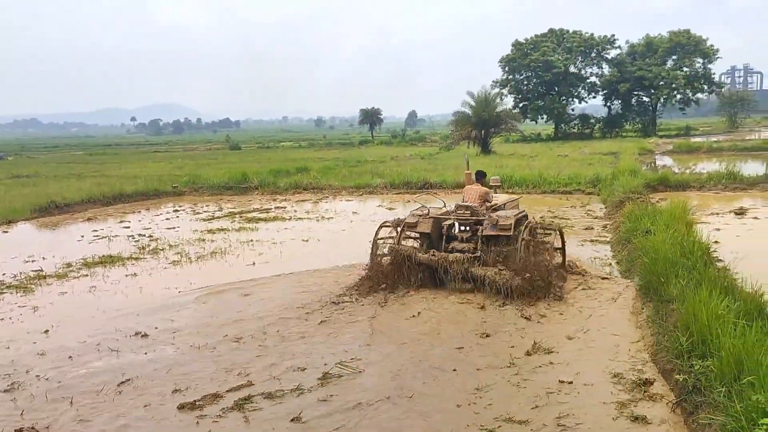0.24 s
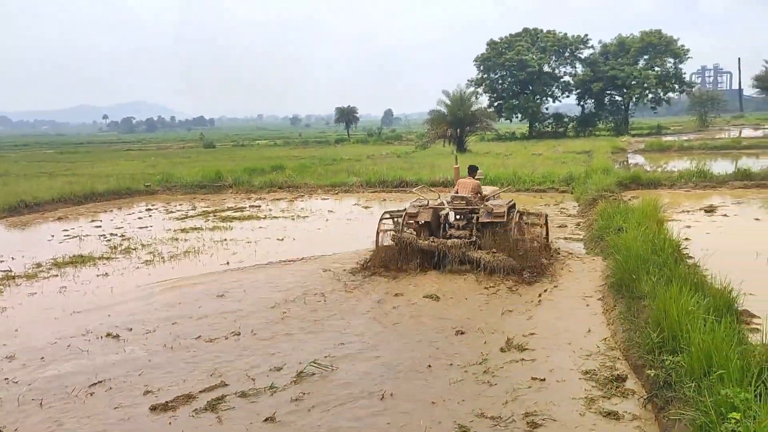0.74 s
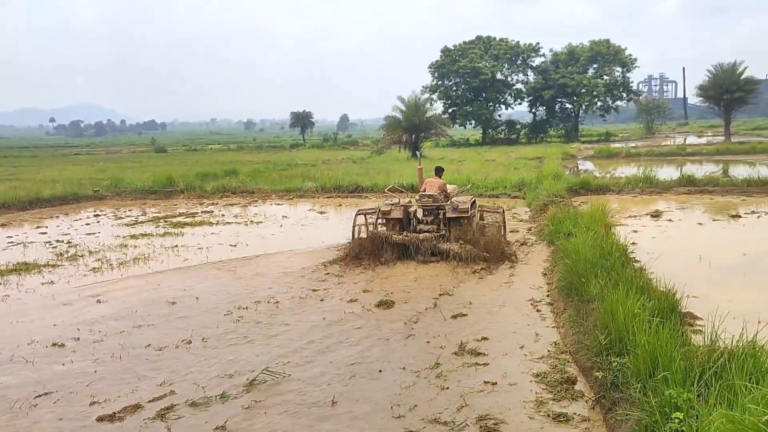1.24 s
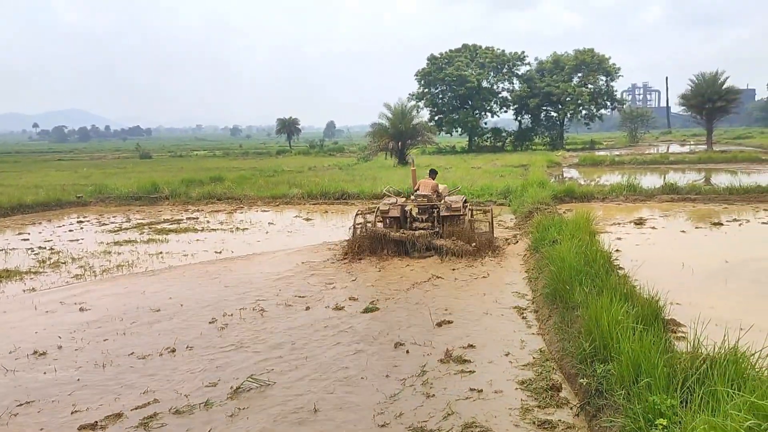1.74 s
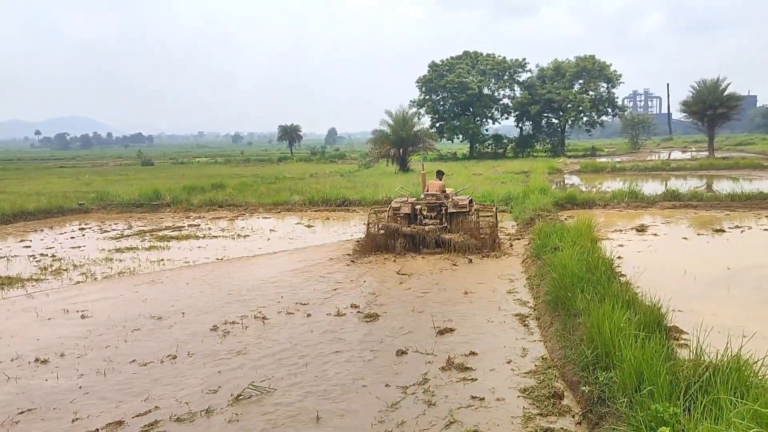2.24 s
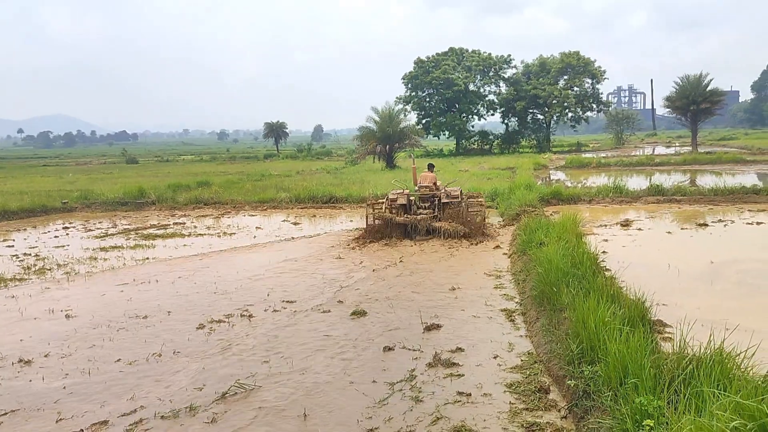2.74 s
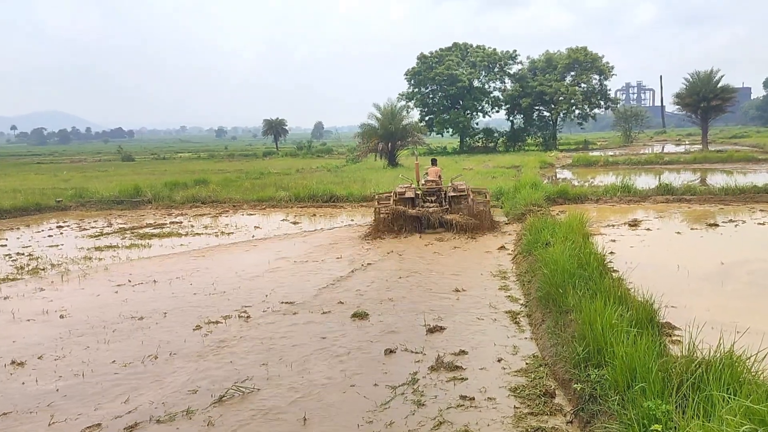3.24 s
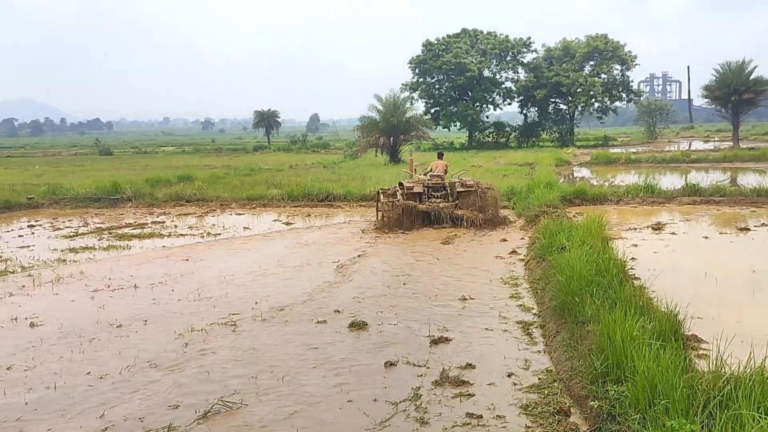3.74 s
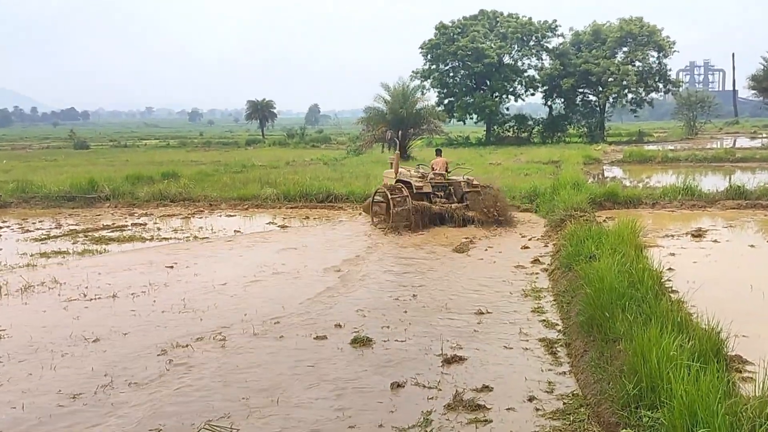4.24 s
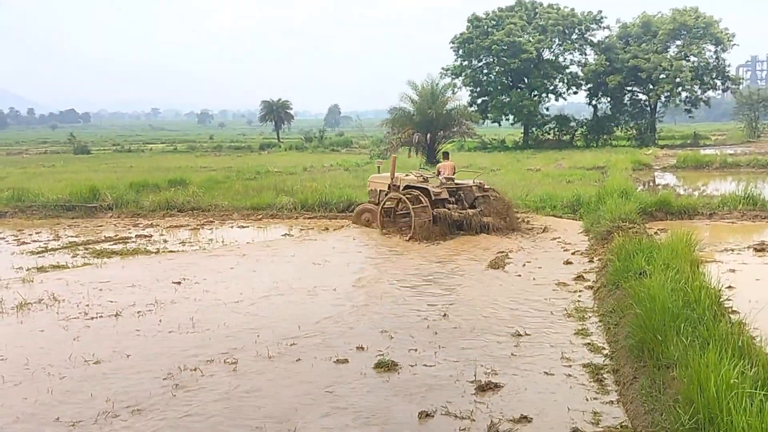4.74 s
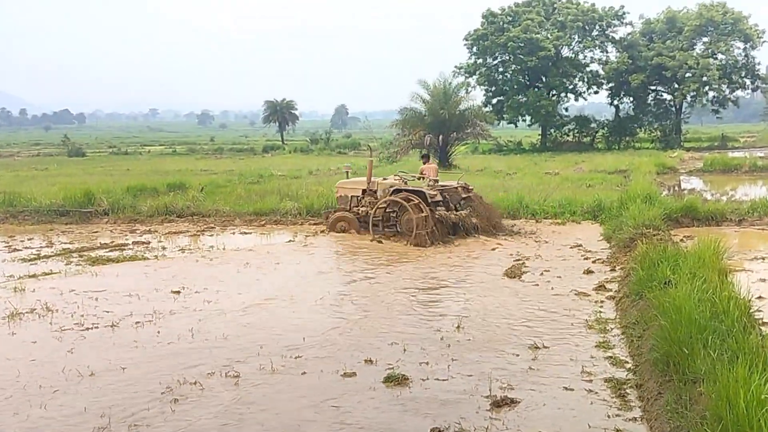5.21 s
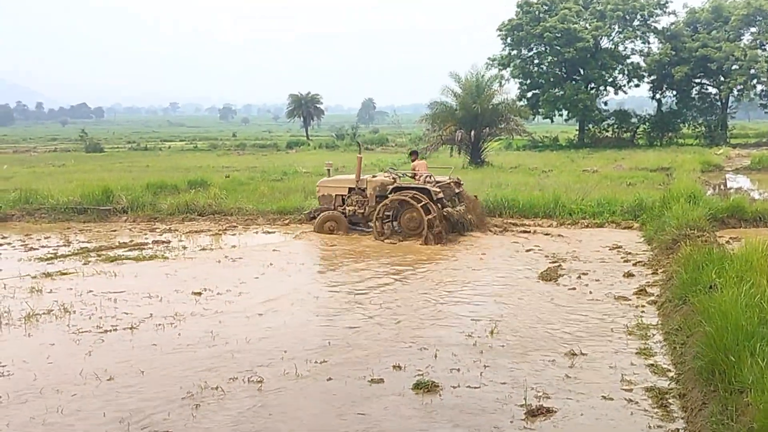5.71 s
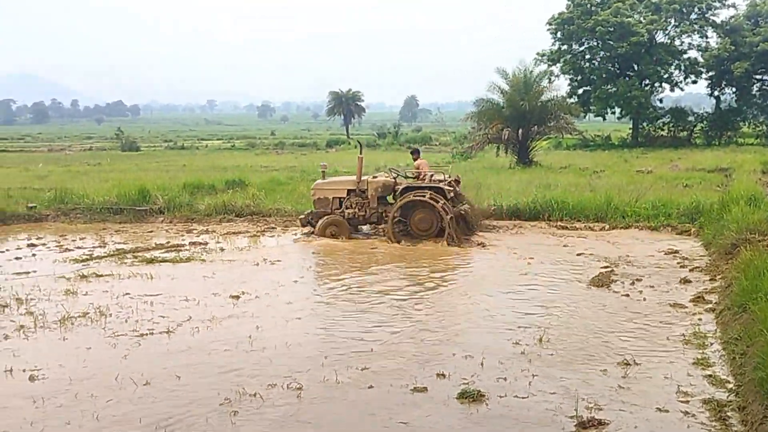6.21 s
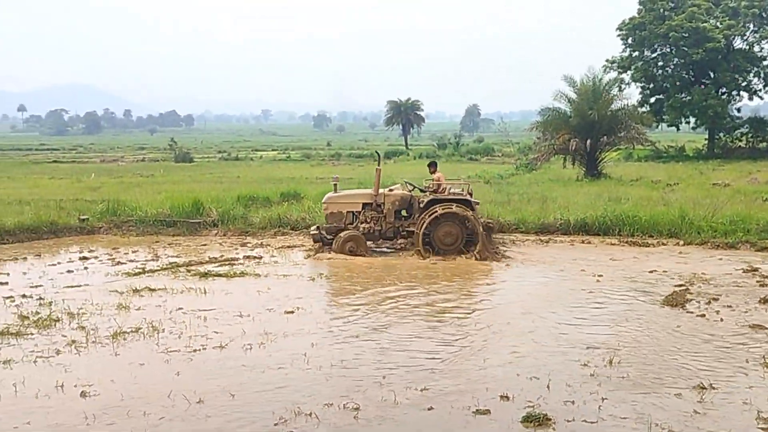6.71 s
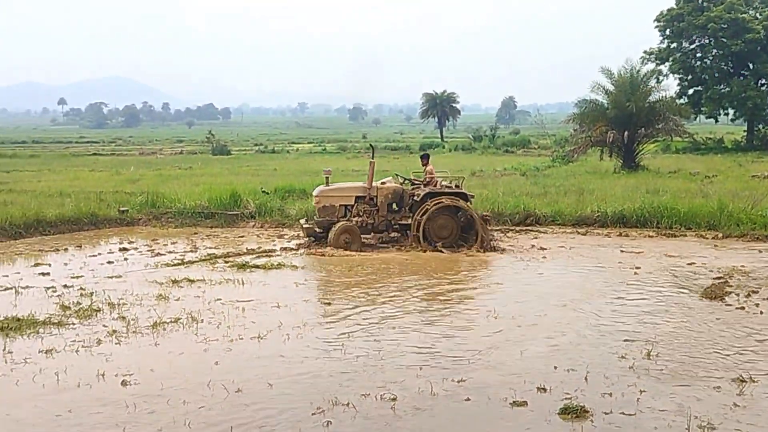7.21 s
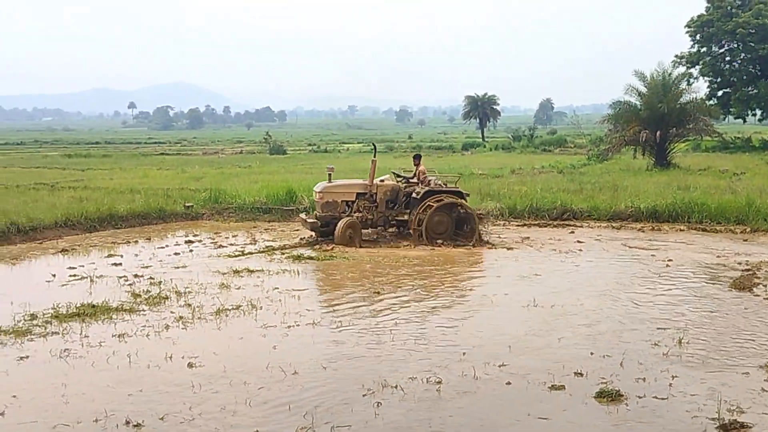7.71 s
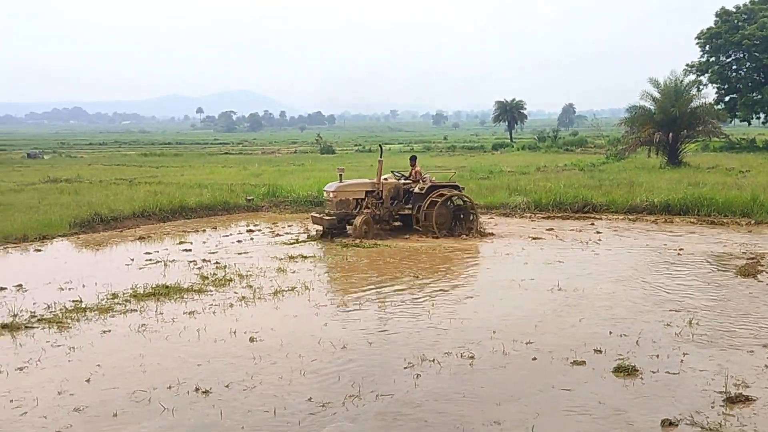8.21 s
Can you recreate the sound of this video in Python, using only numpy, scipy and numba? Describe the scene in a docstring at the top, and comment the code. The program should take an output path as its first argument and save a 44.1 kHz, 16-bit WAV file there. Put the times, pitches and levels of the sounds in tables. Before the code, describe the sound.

Steady low diesel throb and wet wheel churn outdoors; the engine briefly sags, then digs in slower and rougher, its bright, raspy exhaust slowly climbing.

```python
"""Tractor in a flooded field

A three-cylinder diesel tractor pulls tail-on, eases off while turning side-on, and pulls again.
Each firing gives a low thump and a burst of rough gas that rings the exhaust pipe at its first modes.
Filtered noise makes the wheels' churn and spray, the higher pipe modes and the exhaust hiss.
A gear sings faintly as narrow noise, and a few ripples plop at the near bank as short, rising tones."""
import sys
import numpy as np
from scipy import signal
from scipy.fft import rfft, irfft, next_fast_len
from scipy.io import wavfile
from scipy.ndimage import uniform_filter1d
from numba import njit

SR = 44100
rng = np.random.default_rng(int(sys.argv[2]) if len(sys.argv) > 2 else 0)


def output_pcm(signal):
    """Save a mono or channel-first signal as 16-bit PCM at the path in sys.argv[1].

    Samples are clipped to [-1, 1] before scaling.
    """
    pcm = np.clip(np.atleast_2d(signal).T, -1, 1) * 32767
    wavfile.write(sys.argv[1], SR, np.round(pcm).astype(np.int16))


N = 373086

# ripples at the bank: t/s (start is 12 ms earlier), starting f/Hz, level/dB before a 13 dB lift and
# the soft start, fall by 60 dB/s before 0.053 s is added, left over right/dB
PLOPS = [(1.24, 662, -38, 0.074, 19), (1.26, 880, -29, 0.1, 16), (1.48, 623, -31, 0.071, 14),
         (1.56, 472, -30.5, 0.071, 14), (1.9, 604, -40, 0.19, 19), (1.92, 816, -38, 0.057, 8),
         (1.922, 3750, -46.5, 0.1, -21)]
# gear whine: t/s, f/Hz, level/dB
GEAR = [(0, 915, -50), (2.1, 912, -48), (4.4, 870, -62), (4.6, 850, -75), (8.46, 850, -75)]
# colour of the wheels' churn in the mud: f/Hz, relative level per Hz/dB
CHURN_COLOUR = [(25, -29), (45, -6.5), (110, -8), (180, -2), (230, -6), (330, -0.5), (480, -16),
                (600, -11.5), (900, -42)]
# colour of the spray: f/Hz, relative level per Hz/dB
SPRAY_COLOUR = [(300, -30), (500, -9), (1150, -6.5), (1850, 2.5), (2450, 1), (2720, 2.5), (3400, -8.5),
                (4700, -12.5), (7000, -17.5), (11000, -19), (16000, -26)]
# colour of the exhaust hiss: f/Hz, relative level per Hz/dB
HISS_COLOUR = [(3000, -39), (4600, -6), (5100, -11.5), (6000, -4), (7700, -5), (8500, 5), (10500, -0.5),
               (11600, -1.5), (14600, -6.5), (15700, -19)]
# higher pipe modes: f/Hz before they move with mode 3, width of each resonance/Hz, relative level/dB
HIGH_MODES = [(3070, 380, 3), (3577, 110, -4.5), (3750, 220, -3.5), (4290, 340, 1), (5460, 160, -8.5),
              (6950, 150, -7.5), (8670, 1600, -5), (9480, 170, -4), (10480, 510, -1)]
# first pipe modes, following gas heat and the side in view: t/s, mode 1 f/Hz, mode 2 f/Hz, mode 3 f/Hz
PIPE_TUNING = [(0, 763, 1460, 2166), (1.0, 772, 1436, 2214), (1.86, 768, 1474, 2190),
               (2.66, 727, 1385, 2260), (3.4, 705, 1410, 2130), (5.2, 762, 1469, 2290),
               (8.46, 773, 1512, 2319)]
# one row per pipe mode: width of each resonance/Hz, swell time/s (a ring peaks after two of these),
# left-right likeness of its noise (0-1)
PIPE_MODES = [(361, 0.0017, 0.94), (244, 0.0025, 0.84), (330, 0.0021, .9)]
# the hardest barks: t/s (ring starts 3 ms earlier), level/dB before the offset of each mode,
# tilt/dB (above 0 lowers mode 2, below 0 lowers mode 3)
BARKS = [(0.1191, -28, -3.5), (0.8285, -23, 3), (1.2955, -19, -10), (3.2086, -19, -6), (3.6641, -13, -17),
         (3.936, -23, 3), (4.0736, -18, 9), (4.366, -17, -13), (4.4049, -21, 1), (4.4952, -15, -24),
         (4.9881, -13.5, 15), (5.437, -11.5, -3), (5.5388, -11.5, -3.5), (5.7668, -10, -17),
         (5.7907, -13.5, 0), (5.8182, -13, 7), (6.0736, -12.5, 12), (6.2238, -15, 2), (6.3744, -9.5, 16),
         (6.3984, -9, -12), (6.4996, -13, 16), (6.5256, -9, 20), (6.6223, -3.5, -10), (6.7236, -6.5, 27),
         (6.7476, -8, 19), (6.7965, -9.5, 7), (6.8204, -10, 24), (6.8937, -6, -3), (6.9661, -10, 3),
         (7.0379, -10.5, -1), (7.1581, -6, 20), (7.1816, -7.5, 0), (7.3667, -8.5, 2), (7.4365, -10.5, 7),
         (7.4809, -7, 12), (7.5472, -4, -10), (7.5717, -8, 4), (7.6844, -16, 3), (7.7069, -8, 16),
         (7.8186, -12.5, 3), (7.8401, -6, -5), (7.9508, -10, -3), (7.9723, -8, -6), (8.0162, -12.5, 21),
         (8.0386, -8.5, -1), (8.0596, -7, -1.5), (8.1239, -4, -6), (8.1898, -8, 13), (8.4457, -15, 12)]
# offset of each pipe mode from the bark's level: level/dB for modes 1, 2, 3
BARK_OFFSETS = [-19, -7.5, -1]
# average surge strength of each cylinder in turn: level/dB
CYLINDER_STRENGTH = [2, 1.5, 2.5]
# engine speed: t/s, firings per second/Hz
SPEED = [(0.0, 54.13), (0.2, 55.49), (0.6, 54.05), (1.8, 54.79), (2.4, 53.7), (3.2, 54.18), (3.4, 52.28),
         (4.35, 50.88), (4.85, 41.81), (5.0, 40.48), (5.6, 39.29), (6.0, 39.33), (6.6, 40.25), (7.2, 42.29),
         (7.4, 44.08), (7.8, 44.56), (8.0, 46.12), (8.46, 46.9)]
# fuel per stroke, cut off as the throttle shuts and back in a step: t/s, level/dB
FUEL = [(0, 2.5), (.5, 0), (.8, 2), (1.5, -.5), (2.0, -0.5), (2.3, 1), (3.2, -2), (3.65, -0.5),
        (4.43, -2.5), (4.48, -15), (4.72, -18), (4.75, -9), (5.15, -1), (5.6, -1), (5.95, -1.5),
        (6.25, 0.5), (7.0, -1.5), (8.46, 0.5)]
# weight of a thump order at its pitch, before fuel is added: f/Hz, level/dB
THUMP_COLOUR = [(39, -43.5), (46, -38), (51, -35.5), (55, -31.5), (80, -24.5), (92, -28.5), (102, -27.5),
                (109, -28.5), (120, -33), (135, -30.5), (160, -37), (176, -37.5), (186, -54), (205, -41.5),
                (218, -45.5)]
# gas drive of the pipe: t/s, level/dB
DRIVE = [(0, 2.5), (.5, -2), (.85, 1), (1.4, -1.5), (2.2, -4), (2.6, -1), (2.95, 0), (4.3, 2.5),
         (4.45, -1.5), (4.62, -7.5), (4.87, -7), (5.1, -2), (5.9, 0.5), (6.3, 2), (6.9, 4), (7.9, 6),
         (8.46, 1.5)]
# treble control: t/s, level/dB
TREBLE = [(0, 4), (.44, -2), (1.0, 6.5), (1.4, -3), (2.0, -1), (2.69, 3.5), (3.0, -5.5), (3.5, -6),
          (4.36, 0), (4.46, -9), (4.9, -14), (4.98, 6.5), (5.2, 14), (5.8, 17.5), (6.4, 23), (7.2, 20),
          (7.9, 17.5), (8.46, 13.5)]
# wheel work in the mud: t/s, level/dB
WHEELS = [(0, 2), (.44, 1.5), (2.9, 0), (4.0, -1), (4.36, 0.5), (4.47, -1.5), (4.9, -1), (5.2, -4.5),
          (6.5, -5.5), (7.2, -4), (7.8, -3), (8.46, 1)]
# swing from tail-on to side-on: start t/s, end t/s
TURN = (3.94, 5.4)
# mix of each named layer: base level/dB, shares of drive, treble and wheel work (dB per dB),
# level gained side-on/dB
LAYERS = {"mode 1": (-35, 0.35, 0.1453, 0.71, -0.5), "mode 2": (-35, 0.88, 0.0061, 0.4, 1.5),
          "mode 3": (-37.5, 1.07, 0.174, 0.35, 3), "upper orders": (-42.5, 1.0, 0.0623, 1.96, 5),
          "churn": (-32.5, -0.08, 0.08, 1.0, -1.6), "spray": (-38, 0.35, 0.26, 1.5, 1),
          "high modes": (-52.5, 0.93, 0.7, 0.68, 3), "hiss": (-55, -0.38, 1.0, 0.95, 2.7)}
# handset body between its two microphone ports: f/Hz, left over right level/dB (less in the bass)
HANDSET_SHADE = [(500, 0), (780, 0.5), (950, -12.5), (1280, 10.5), (1460, -2.5), (1640, -4), (2130, -1),
                 (2330, -8.5), (2550, -6.5), (2800, -3.5), (3600, 0), (6900, 3), (8600, -3), (10500, -3.5),
                 (13000, 0)]
# phase by which the left port leads the right: f/Hz, phase/rad
LEFT_LEAD = [(900, .02), (1290, .4), (1460, .4), (1640, 1.1), (2130, .4), (2330, 1.7), (2520, 2.8),
             (2760, 1.3), (3100, -2.2), (3600, -1), (4300, .4), (5200, .4), (6900, -.8), (8600, 2.9),
             (10300, 1.2), (13000, 2.0)]

VALVE_OPENS, THUMP_PEAKS = 0.066, 0.29   # share of the firing interval
SILENCER_HZ, SILENCER_WIDTH_HZ = 275, 38   # chamber resonance that lifts whichever order passes it
FIRST_ORDER_FUEL = 0.55   # the first order follows the fuel only in part
STEADY_TAIL_ON, STEADY_SIDE_ON = 1, 0.15   # steady gas flow between surges, relative to their peak
STEADY_COASTING = 0.082   # steady flow added per dB of fuel cut
STACK_LIKENESS = 0.55   # left-right likeness of the high modes; the hiss has 0.15 less
HIGH_TUNED_AT_HZ = 2290   # mode 3 pitch at which the higher modes sit as listed
SWELL_DB, SWELL_S = 1.5, 0.07   # spread and step of each pipe mode's slow swelling and sagging
SHADE_FROM_HZ = 450   # below this the handset shades less and less
CUTOFF_HZ = 15950   # from here up the sound is at least 70 dB down


def amp(db):
    """Turns dB into gain."""
    return 10 ** (np.asarray(db) / 20)


def rms_one(x):
    """Scales a sound to rms 1."""
    return x / np.sqrt(np.mean(np.square(x)) + 1e-20)


def in_time(rows):
    """Draws straight lines between a table's times, one value per sample for each column."""
    s, *columns = np.transpose(rows)
    return [np.interp(np.arange(N) / SR, s, column) for column in columns]


def at_hz(points, hz):
    """Reads a table on a log-frequency axis."""
    table_hz, values = np.array(points).T
    return np.interp(np.log(hz), np.log(table_hz), values)


def side_on():
    """Share of the turn done, from 0 tail-on to 1 side-on."""
    return np.interp(np.arange(N) / SR, TURN, [0, 1])


def level_db(layer):
    """Adds up a layer's level from the controls that it follows."""
    base, *shares = LAYERS[layer]
    controls = in_time(DRIVE) + in_time(TREBLE) + in_time(WHEELS) + [side_on()]
    return base + sum(share * control for share, control in zip(shares, controls))


def wander(step_s):
    """Slow chance with spread about 1: a new value every step, joined by lines."""
    steps = rng.standard_normal(200)
    return np.interp(np.arange(N) / SR / max(step_s, 0.045), np.arange(len(steps)), steps)


def pair(alike):
    """Makes two white noises that share part of their chance."""
    alike = np.clip(alike, 0, 1)
    mid, side = rng.standard_normal((2, N))
    return np.sqrt((1 + alike) / 2) * mid + np.sqrt((1 - alike) / 2) * side * [[1], [-1]]


def spectral_gain(x, gain_at):
    """Applies a gain for each frequency to a stereo sound."""
    size = next_fast_len(N)
    hz = np.maximum(np.arange(size // 2 + 1) * SR / size, 1)
    return irfft(rfft(x, size) * gain_at(hz), size)[:, :N]


def coloured(x, spectrum):
    """Lays a spectrum on stereo noise and scales it to rms 1."""
    return rms_one(spectral_gain(x, lambda hz: amp(at_hz(spectrum, hz))))


@njit
def chain(x, cosine, r, count):
    """Runs equal resonances in a row, free to move, each with a gain of about 1 on top."""
    out = x.copy()
    for turn in range(count):
        y1 = y2 = x1 = x2 = 0.
        for i in range(len(out)):
            y = (1 - r * r) / 2 * (out[i] - x2) + 2 * r * cosine[i] * y1 - r * r * y2
            x2, x1, y2, y1 = x1, out[i], y1, y
            out[i] = y
    return out


def resonate(x, hz, width_hz, count):
    """Rings a sound through resonances set by a centre (fixed or moving) and a width."""
    cosine = np.cos(2 * np.pi * hz / SR) * np.ones(len(x))
    return chain(x + 1e-18, cosine, np.exp(-np.pi * width_hz / SR), count)


def plops():
    """Each trapped bubble swells in softly and rings away, rising slightly in pitch."""
    out = np.zeros((2, N))
    t = np.arange(SR // 4) / SR
    for s, hz, peak_db, t60, pan_db in PLOPS:
        swell = (1 - np.exp(-t / 0.019)) ** 2
        decay = amp(peak_db + 13 - 60 * t / (t60 + 0.053))
        ring = swell * decay * np.sin(2 * np.pi * hz * t * (1 + 0.14 * t))
        start = round((s - 0.012) * SR)
        out[:, start:start + len(t)] += ring * amp([[pan_db / 2], [-pan_db / 2]])
    return out


def gear():
    """A faint, unsteady gear whine: noise through a narrow moving resonance."""
    hz, whine_db = in_time(GEAR)
    return amp(whine_db) * rms_one([resonate(noise, hz, 10, count=2) for noise in pair(0.6)])


def blasts(firing, steady, fall, spread_db):
    """Gas surges after each valve opening, of uneven strength, over a steady flow; power is evened out."""
    since = (firing - VALVE_OPENS) % 1   # in firing intervals, as is fall
    number = (firing - VALVE_OPENS + 1).astype(int)
    count = number[-1] + 1
    chance_db = spread_db * np.clip(rng.standard_normal(count), -2, 2)
    strength_db = chance_db + np.resize(CYLINDER_STRENGTH, count)
    surge = since / fall * np.exp(1 - since / fall) * amp(strength_db)[number]
    flow = np.clip(steady, 0, 2) + surge
    return flow / np.sqrt(uniform_filter1d(flow ** 2, SR // 6))


def wheels(firing):
    """Mud churn and spray: coloured noise that throbs a little with each firing."""
    throb = blasts(firing, 2, fall=0.25, spread_db=2.5)
    churn = coloured(pair(0.98) * throb, CHURN_COLOUR)
    spray = coloured(pair(0.029) * throb, SPRAY_COLOUR)
    return amp(level_db("churn")) * churn + amp(level_db("spray")) * spray


def exhaust_hiss(firing, steady):
    """The gas jet hisses as coloured noise, stronger with each surge."""
    jet = blasts(firing, 0.2 + 0.8 * steady, fall=0.19, spread_db=1.2)
    hiss = coloured(pair(STACK_LIKENESS - 0.15) * jet, HISS_COLOUR)
    return amp(level_db("hiss")) * hiss


def high_modes(firing, steady, stretch):
    """Each surge of rough gas feeds every higher pipe mode with a strength of its own."""
    out = 0
    for hz, width_hz, mode_db in HIGH_MODES:
        flow = blasts(firing, 0.072 + 0.8 * steady, fall=0.19, spread_db=5.0)
        gas = pair(STACK_LIKENESS) * flow
        out = out + amp(mode_db) * rms_one([resonate(g, hz * stretch, width_hz, count=2) for g in gas])
    return amp(level_db("high modes")) * rms_one(out)


def rings(at, peak, hz, swell_s):
    """Each front swells a mode smoothly, with its own phase and slight detuning, and lets it die."""
    out, u = np.zeros(N + SR), np.arange(SR // 40) / SR
    shape = (u / swell_s / 2) ** 2 * np.exp(2 - u / swell_s)
    at = np.clip(at, 0, N - 1)
    phase = rng.random(len(at))   # in turns
    detune = 1 + 0.031 * np.clip(rng.standard_normal(len(at)), -1.5, 1.5)
    turns = phase[:, None] + np.outer(hz[at] * detune, u)
    waves = peak[:, None] * shape * np.cos(2 * np.pi * turns)
    np.add.at(out, at[:, None] + np.arange(len(u)), waves)
    return out[:N]


def pipe(firing, tuning_hz, steady):
    """Surges ring each mode, cleanly by their front and roughly by turbulence; hard barks stand above."""
    out = 0
    s, peak_db, tilt_db = np.transpose(BARKS)
    tilts_db = [0 * s, np.minimum(-tilt_db, 0), np.minimum(tilt_db, 0)]
    barks_db = peak_db + np.array(BARK_OFFSETS)[:, None] + tilts_db
    bark_starts = np.round((s - 0.003) * SR).astype(int)
    fronts = np.flatnonzero(np.diff(np.floor(firing - 0.14)))
    names = ["mode 1", "mode 2", "mode 3"]
    for name, bark_db, hz, (width_hz, swell_s, alike) in zip(names, barks_db, tuning_hz, PIPE_MODES):
        gas = pair(alike) * blasts(firing, steady, fall=0.27, spread_db=4.0)
        rough = rms_one([resonate(g, hz, width_hz, count=3) for g in gas])
        # fronts come up to 2.694 ms late, and weaker when the flow is steadier
        late = (0.002694 * rng.random(len(fronts)) * SR).astype(int)
        strength = np.clip(rng.standard_normal(len(fronts)), -2, 1.5)
        peak = 2.48 * amp(5.7 * strength) / (1 + 1.5 * steady[fronts])
        clean = rings(fronts + late, peak, hz, swell_s)
        barks = rings(bark_starts, amp(bark_db), hz, swell_s)
        mode_gain = amp(level_db(name) + SWELL_DB * wander(SWELL_S))
        out = out + mode_gain * (rough + clean) + barks
    return out


def thump(firing, rate, fuel_db):
    """Pressure pulse built from eight orders of the firing rate; the lowest lead, as behind a low cut."""
    gains = []
    for k in range(1, 5):
        fuel_share = FIRST_ORDER_FUEL if k == 1 else 1
        gains.append(amp(at_hz(THUMP_COLOUR, k * rate) + fuel_db * fuel_share))
    upper = amp(level_db("upper orders"))
    for k in range(5, 9):
        gains.append(upper / np.hypot(1, 2 * (k * rate - SILENCER_HZ) / SILENCER_WIDTH_HZ))
    out = 0
    for k, gain in enumerate(gains, 1):
        lead = 2 * np.arctan((55 / (k * rate)) ** 2)
        # sqrt(2) makes the gain an rms level
        out = out - np.sqrt(2) * gain * np.cos(2 * np.pi * k * (firing - THUMP_PEAKS) + lead)
    return out


def scene():
    """Adds the bank and gear to the engine layers, which all run off one count of firings."""
    (rate,), (fuel_db,), tuning_hz = in_time(SPEED), in_time(FUEL), in_time(PIPE_TUNING)
    firing = np.cumsum(rate) / SR + 1
    turned = STEADY_TAIL_ON + (STEADY_SIDE_ON - STEADY_TAIL_ON) * side_on()
    coasting = STEADY_COASTING * np.maximum(-fuel_db - 0.5, 0)
    steady = np.clip(turned + coasting, 0, 2)
    stretch = tuning_hz[2] / HIGH_TUNED_AT_HZ
    background = plops() + gear() + wheels(firing)
    treble = exhaust_hiss(firing, steady) + high_modes(firing, steady, stretch)
    return background + treble + pipe(firing, tuning_hz, steady) + thump(firing, rate, fuel_db)


def record(dry):
    """The handset shades and delays one port against the other, rounds peaks and cuts the top steeply."""
    half = np.array([[0.5], [-0.5]])   # left gets half the difference, right the opposite half

    def port_gain(hz):
        """Level and phase at each port; long waves pass round the handset unshaded."""
        shade_db = at_hz(HANDSET_SHADE, hz) * half * np.minimum(hz / SHADE_FROM_HZ, 1) ** 2
        return amp(shade_db) * np.exp(1j * at_hz(LEFT_LEAD, hz) * half)

    rounded = np.tanh(spectral_gain(dry, port_gain))
    top_cut = signal.cheby2(20, 70, CUTOFF_HZ, fs=SR, output="sos")
    return signal.sosfilt(top_cut, rounded)


dry = scene()
out = record(dry)
output_pcm(out)
```